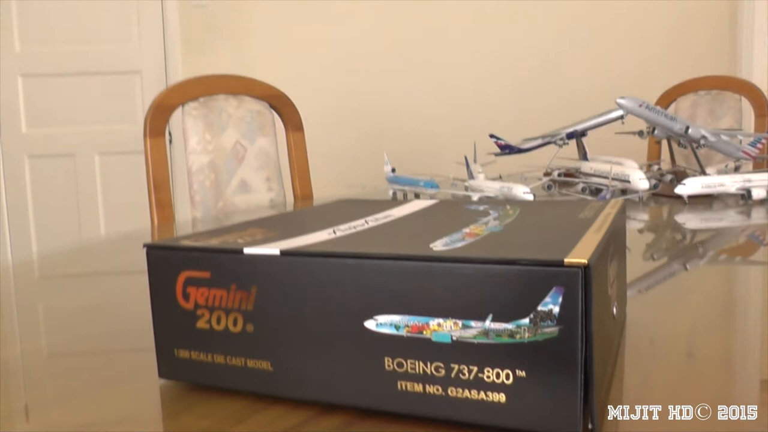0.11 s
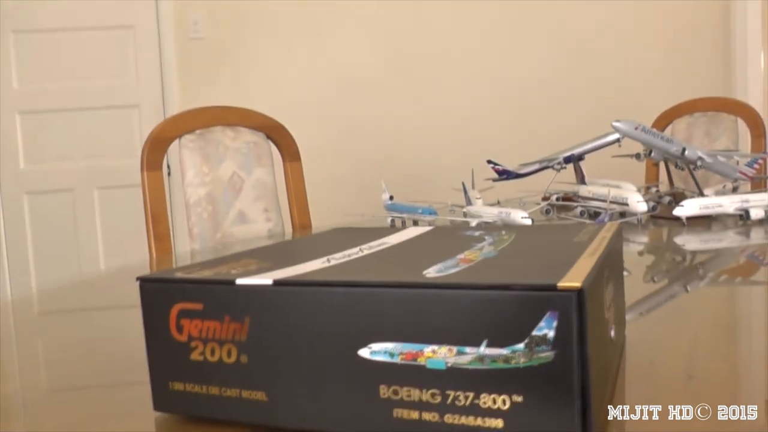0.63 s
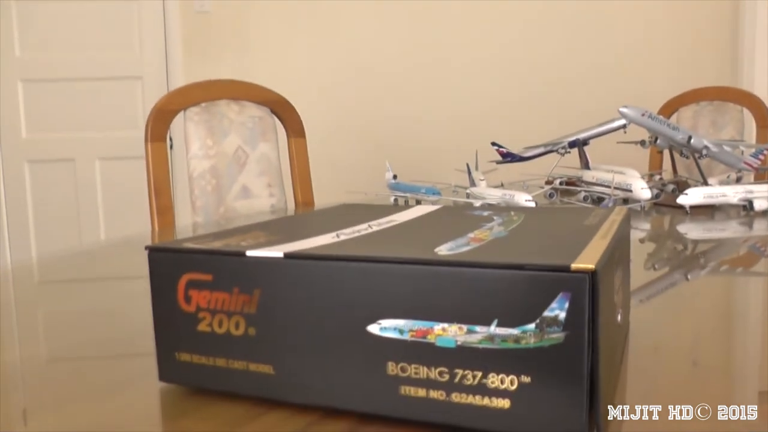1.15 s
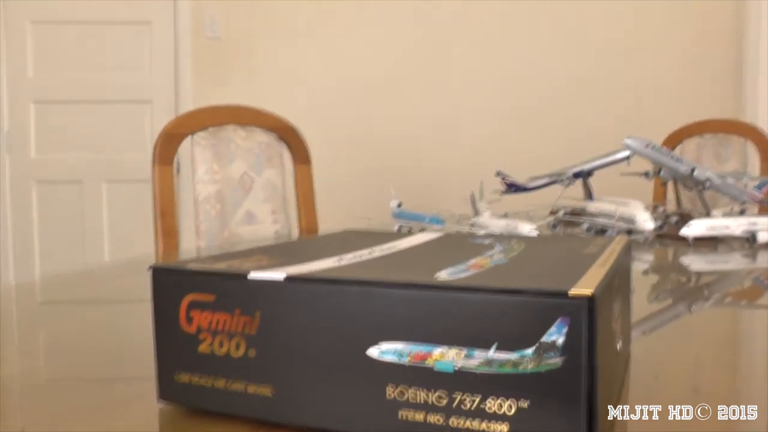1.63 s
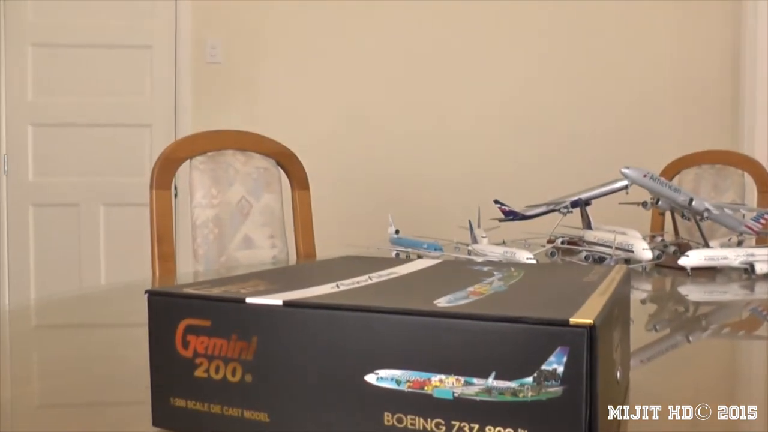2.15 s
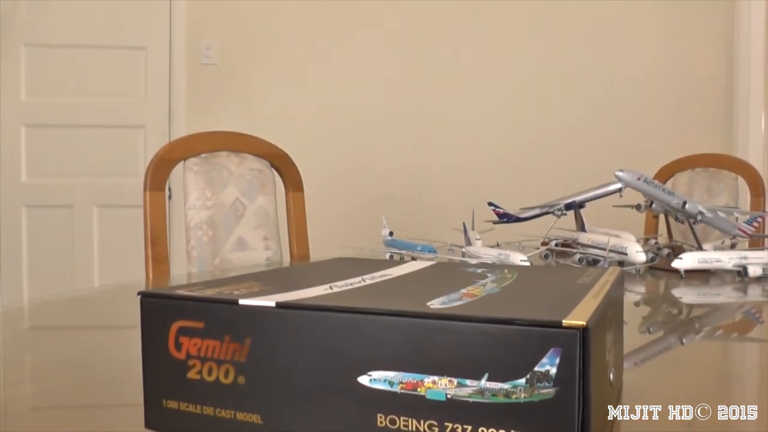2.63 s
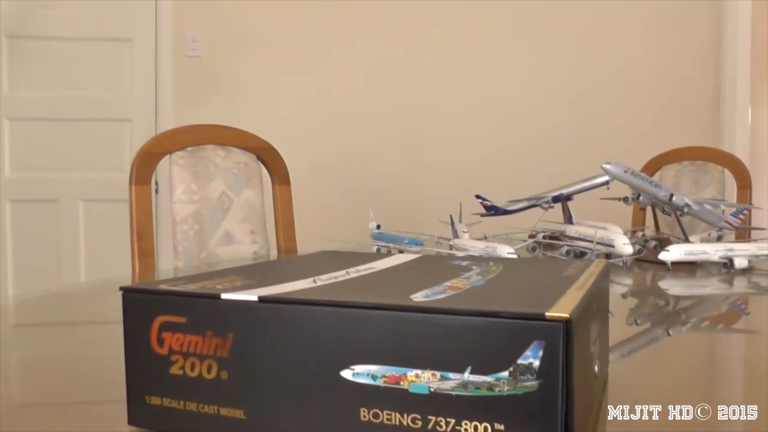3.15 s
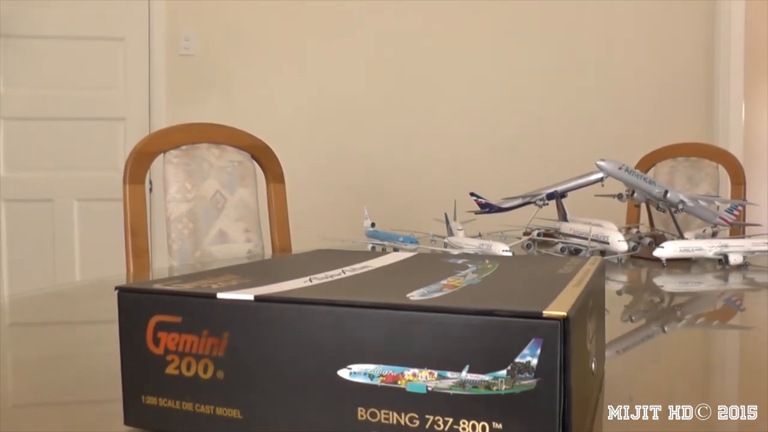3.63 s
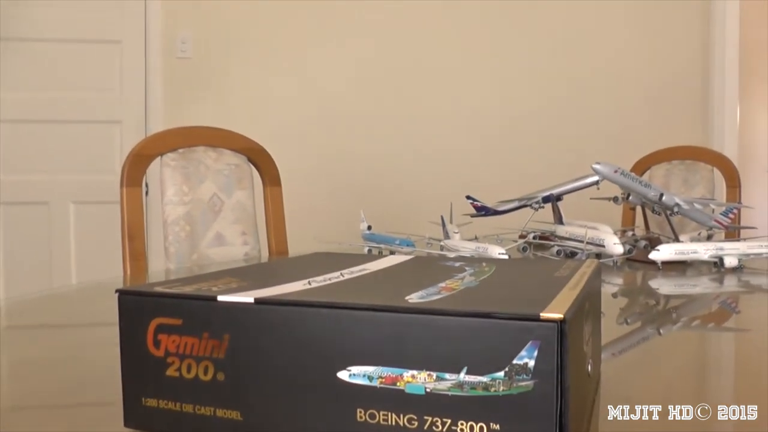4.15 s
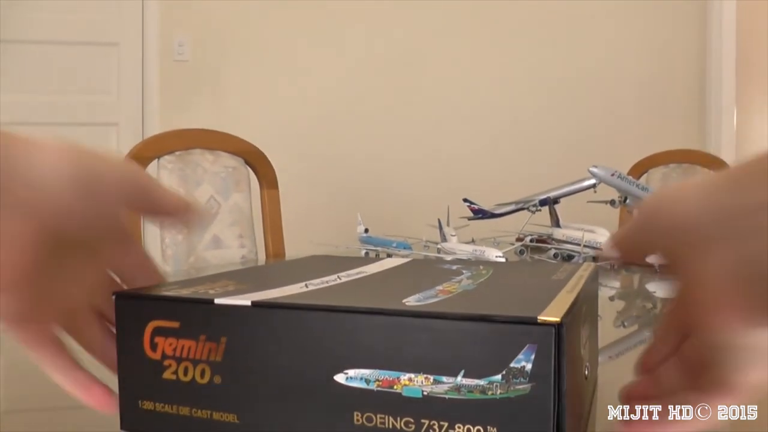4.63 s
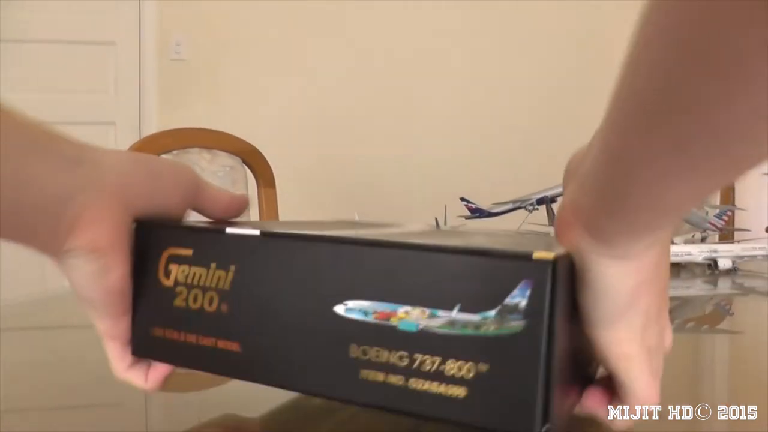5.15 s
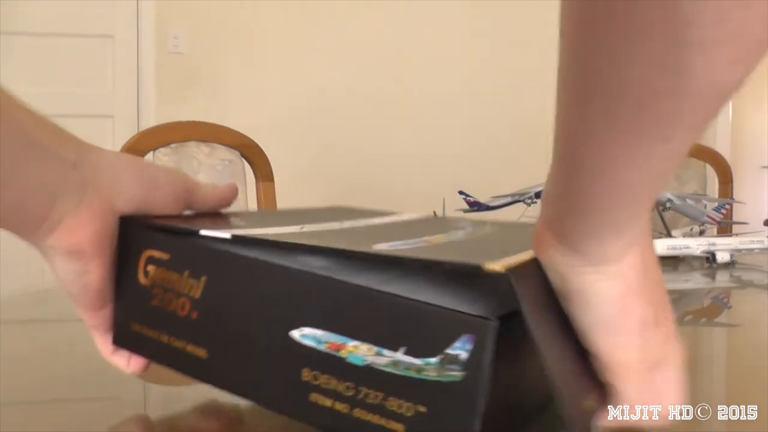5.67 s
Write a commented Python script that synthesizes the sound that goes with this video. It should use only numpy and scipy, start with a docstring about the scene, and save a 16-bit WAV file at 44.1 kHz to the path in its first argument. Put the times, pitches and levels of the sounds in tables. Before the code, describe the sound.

Plastic camera casing creaks, snaps and thuds close up, then hands slide over a cardboard box and its flap pops free with hollow knocks.

```python
"""Indoors, over steady room tone and hiss, hands first shift a small camera: its plastic shell creaks,
snaps and thuds close to the microphones, as bursts of tiny slips that excite its resonances.
Then skin slides over a cardboard box, as modulated noise with rumble, scrape and hiss, and lifts it.
Knocks excite the air and walls of the box; at the end its flap pops free with three hollow knocks
that the room answers with a diffuse decay, while the flap scrapes along the rim."""
import sys
import numpy as np
from scipy import signal
from scipy.fft import rfft, irfft, next_fast_len
from scipy.io import wavfile
from scipy.ndimage import uniform_filter1d, map_coordinates

SR = 44100
rng = np.random.default_rng(int(sys.argv[2]) if len(sys.argv) > 2 else 0)


def nominal_scale(level):
    """Amplitude ratio for a level in decibels (scalar or array-like)."""
    x = np.asarray(level, float) / 20
    return 10 ** x


def output_pcm(signal):
    """Save a mono or channel-first signal as 16-bit PCM at the path in sys.argv[1].

    Samples are clipped to [-1, 1] before scaling.
    """
    pcm = np.clip(np.atleast_2d(signal).T, -1, 1) * 32767
    wavfile.write(sys.argv[1], SR, np.round(pcm).astype(np.int16))


N = 254803


def unit(x):
    """Normalization: a signal scaled to rms 1."""
    return x / np.sqrt(np.mean(x ** 2) + 1e-20)


def along(points, hz):
    """Logarithmic frequency scale: values interpolated between (frequency [Hz], value) points."""
    f, v = np.transpose(points)
    return np.interp(np.log(hz + 1), np.log(f + 1), v)


def filtered(x, response):
    """Linear filtering: the spectrum of x times a complex frequency response."""
    size = next_fast_len(N + SR // 2)
    spectrum = rfft(x, size) * response(np.fft.rfftfreq(size, 1 / SR))
    return irfft(spectrum, size)[..., :N]


# likeness of left and right: (frequency [Hz], correlation [0-1])
LIKENESS = [(60, 0.97), (240, 0.89), (950, 0.94), (3770, 0.93), (15000, 0.011)]


def paired(two, response):
    """Interchannel coherence: two unrelated signals mix into ports alike in the bass, apart in the treble."""
    def turn(hz):
        return np.arccos(np.clip(along(LIKENESS, hz), -1, 1)) / 2

    mid, side = filtered(two, lambda hz: response(hz) * [np.cos(turn(hz)), np.sin(turn(hz))])
    return np.array([mid + side, mid - side])


def body(modes, f):
    """Modal superposition: damped resonances of alternating sign sum to a causal response of mean power 1."""
    g = 0
    for k, (center, width, db) in enumerate(modes):
        resonance = 1j * f * width / (center ** 2 - f ** 2 + 1j * f * width)
        g = g + (-1) ** k * nominal_scale(db) * resonance
    g = g / (1 + 0.5j * f / modes[-1][0]) ** 2  # steep fall in the treble
    return g / np.sqrt(np.mean(abs(g) ** 2))


def ringing(x, modes):
    """Forced vibration: x drives the resonances of a body."""
    return filtered(x, lambda hz: body(modes, hz))


def slips(times, levels_db, lengths_ms, modes, apart, swell=1, blow=0):
    """Stick-slip excitation: swelling, dying bursts of tiny slips, each with a blow at its height, ring a body.

    apart is the share that differs in sign between the ports; blow is relative to the rest of the burst."""
    out, size = np.zeros((2, N + SR)), SR // 5
    response = body(modes, np.fft.rfftfreq(size, 1 / SR))
    for s, db, ms in zip(times, levels_db, lengths_ms):
        u = 1000 * np.arange(size) / SR / max(ms, 0.1)
        shape = u ** swell * np.exp(-2 * u)
        push = rng.standard_normal((2, size)) * shape
        push[0, shape.argmax()] += blow * np.linalg.norm(shape)
        both, odd = irfft(rfft(push) * response, size)
        ring = both + apart * np.outer([1, -1], odd)
        out[:, round(s * SR):][:, :size] += nominal_scale(db) * ring / np.linalg.norm(both)
    return out[:, :N]


def crackle(per_second, spread_db):
    """Random impulse process: sparse sticks and slips of uneven size, partly shared by the ports, rms 1."""
    when, size = rng.random((2, N))
    jolts = (when < per_second / SR) * nominal_scale(-spread_db * np.log(size + 1e-4))
    separate = jolts * rng.standard_normal((2, N)) * 1.04
    shared = jolts * rng.standard_normal(N)
    return unit(separate + shared)


def rush(spectrum, grain_db, grain_rate):
    """Amplitude-modulated noise: quick random swells roughen a shaped stereo noise of rms 1."""
    knots = rng.standard_normal(N // 100)
    lumps = nominal_scale(grain_db * map_coordinates(knots, [np.arange(N) * grain_rate / SR]))
    noise = lumps * rng.standard_normal((2, N))
    return unit(paired(noise, lambda hz: nominal_scale(along(spectrum, hz))))


# room tone and microphone hiss: (frequency [Hz], relative spectral density [dB])
AIR_SPECTRUM = [(15, -27), (49, 5), (135, -39), (177, 3.5), (389, -10), (1220, -59), (1640, -8.5),
                (2460, -28.5), (15500, -30), (16100, -64)]


def room_tone():
    """Stationary background noise: room tone and microphone hiss at a nearly steady level."""
    return nominal_scale(-64) * rush(AIR_SPECTRUM, grain_db=0.6, grain_rate=12)


# decay of the room: (frequency [Hz], time to fall by 60 dB [s])
ROOM_DECAY = [(200, 0.65), (3000, 0.5), (10000, 0.11)]


def room(x):
    """Diffuse reverberation: each frequency of the room's answer decays exponentially at its own speed."""
    hz, t, z = signal.stft(rng.standard_normal((2, SR // 2)), SR, nperseg=256)
    decay = nominal_scale(-60 * t / along(ROOM_DECAY, hz)[:, None])
    tail = signal.istft(z * decay, SR, nperseg=256)[1]
    tail = tail / np.linalg.norm(tail[0])
    delayed = np.pad(x.mean(0), (250, 0))  # samples before the first reflection
    wet = signal.fftconvolve(delayed[None], tail, axes=1)[:, :N]
    return paired(wet, np.ones_like)


# skin squeaks on plastic, and in the last row one short high tick on the card:
# (start [s], length [s], starting pitch [Hz], level before grit [dB])
SQUEAKS = [(0.687, 0.063, 1740, -59), (.806, .025, 1790, -52), (3.181, 0.049, 774, -43.5),
           (5.422, 0.0043, 3070, -45.5)]
SQUEAK_RISE = 0.062  # share by which the pitch climbs within each tone


def squeaks():
    """Frictional self-oscillation: skin squeaks on plastic, rising, unsteady and gritty; a like tone, only
    milliseconds long, is a high tick on the card."""
    out = np.zeros(N)
    for s, length, hz, db in SQUEAKS:
        t = np.arange(round(length * SR)) / SR
        wander = np.cumsum(0.051 * rng.standard_normal(SR // 5))[:len(t)]
        phase = 2 * np.pi * hz * t * (1 + SQUEAK_RISE * t / length / 2) + wander
        grit = uniform_filter1d(rng.standard_normal(SR // 5), SR // 400)[:len(t)]
        level = nominal_scale(db + 3 * unit(grit)) * np.sin(np.pi * t / length) ** 0.2
        out[round(s * SR):][:len(t)] += level * np.sin(phase)
    return out


# the resting hands never lie quite still: (time [s], level [dB])
REST = [(.3, -58), (.8, -49), (1.03, -63.5), (1.57, -56), (2.1, -55.5), (2.5, -65), (3.1, -56.5),
        (3.45, -62.5), (3.8, -57), (4.25, -64), (4.85, -58.5), (5.57, -61.5)]
# strokes of skin on shell and card: (start [s], length [s], level at the end [dB], swell to it [dB],
# lightness: more hiss, less rumble [dB])
STROKES = [(-.015, 0.12, -62.5, -16.5, 14.5), (0.854, 0.06, -45, -10.5, 2), (1.091, 0.22, -42, 10.5, -1),
           (1.616, 0.12, -41, 12, 0.5), (1.76, 0.1, -58.5, 2, -8.5), (2.095, 0.036, -48.5, -37.5, 0),
           (3.043, 0.057, -51, -17, 1.5), (3.616, 0.16, -49.5, 7.5, 4), (4.467, 0.26, -49, 5, -2),
           (5.07, 0.086, -56.5, 1, -8.5), (5.591, 0.18, -54.5, -13.5, 1)]
STROKE_ATTACK_S, STROKE_FADE_DB_PER_S = 0.012, 228
HISS_LINGERS = 0.32  # share by which the hiss fades slower and the rumble faster
REST_LIGHTNESS_DB = 0.5


def rubbing(tilt):
    """Energy addition: resting hands and strokes that set in, swell or sag and fade; tilt weighs lightness."""
    t = np.arange(N) / SR
    power = nominal_scale(np.interp(t, *np.transpose(REST)) + tilt * REST_LIGHTNESS_DB) ** 2
    fade_rate = STROKE_FADE_DB_PER_S * (1 - HISS_LINGERS * tilt)
    for s, length, db, swell_db, light_db in STROKES:
        k = slice(max(round(s * SR), 0), round((s + length + 0.4) * SR))
        u = t[k] - s
        swell = swell_db * np.maximum(1 - u / length, 0)
        fade = fade_rate * np.maximum(u - length, 0)
        level_db = db - swell - fade + tilt * light_db
        power[k] += (np.minimum(u / STROKE_ATTACK_S, 1) * nominal_scale(level_db)) ** 2
    return np.sqrt(power)


# spectra of sliding skin: (frequency [Hz], relative spectral density [dB])
RUMBLE_SPECTRUM = [(20, -31), (60, -0.5), (250, -4.5), (700, -44)]
SCRAPE_SPECTRUM = [(150, -19), (300, 6), (500, 1), (900, 3.5), (1900, -8), (5000, -33.5)]
HISS_SPECTRUM = [(1500, -10.5), (2400, -10.5), (3500, -13), (4450, -16.5), (5730, -9), (7770, -12.5),
                 (8970, -16.5), (11900, -18.5), (15700, -33), (16500, -57)]
# fingertips brush the card: (time [s], level [dB])
BRUSHES = [(4.894, -28), (5.02, -29.5), (5.11, -24.5), (5.239, -28.5), (5.376, -27.5)]
BRUSH_MS = 50
ON_SHELL_S = 3.9  # the hands leave the shell
SHELL_RUMBLE_DB, SHELL_HISS_DB = -4, -11  # layer gains on the shell
CARD_RUMBLE_DB, CARD_HISS_DB = -9, -6  # layer gains on the card


def hands():
    """Sliding friction: skin rumbles, scrapes, hisses and catches in bumps; the touched body colours it."""
    on_shell = np.arange(N) < ON_SHELL_S * SR
    card = BOX_AIR + BOX_WALLS
    catches = crackle(per_second=170, spread_db=1.5)
    bumps = np.where(on_shell, unit(ringing(catches, SHELL_WALLS)), unit(ringing(catches, card)))
    ticks = on_shell * ringing(crackle(per_second=110, spread_db=3), SHELL_FIZZ)
    s, db = np.transpose(BRUSHES)
    brushes = slips(s, db, [BRUSH_MS] * len(s), CARD_EDGE[2:], apart=0.48)

    rumble = rush(RUMBLE_SPECTRUM, grain_db=2.0, grain_rate=28)
    shell_rumble = nominal_scale(SHELL_RUMBLE_DB) * unit(ringing(rumble, SHELL_THUD[:2]))
    rumble = np.where(on_shell, shell_rumble, nominal_scale(CARD_RUMBLE_DB) * rumble)

    scrape = rush(SCRAPE_SPECTRUM, grain_db=2.5, grain_rate=56)
    card_scrape = unit(scrape + unit(ringing(scrape, card)))
    scrape = np.where(on_shell, nominal_scale(-6) * scrape, card_scrape) + nominal_scale(-8) * bumps

    hiss = rush(HISS_SPECTRUM, grain_db=2.5, grain_rate=38) + nominal_scale(-9) * ticks
    hiss = nominal_scale(np.where(on_shell, SHELL_HISS_DB, CARD_HISS_DB)) * hiss
    return rubbing(tilt=-1) * rumble + rubbing(tilt=0) * scrape + rubbing(tilt=1) * hiss + brushes


# Levels and lengths of creaks, ticks and taps are scaled by each layer's factors in creaks().
# creaks of the camera shell: (time [s], click level [dB], knock level [dB], fizz over click [dB],
# slip length [ms])
CREAKS = [(0.5964, -38, -33, -16, 5.7), (0.6851, -33, -43.5, 2.5, 3.76), (0.813, -41.5, -33, -34, 11.1),
          (.855, -24.5, -31.5, 0, 6.33), (1.225, -20.5, -23.5, -6, 2.77), (1.2698, -46, -41, 11.5, 1.3),
          (1.314, -31.5, -36.5, -7, 8.4), (1.335, -39.5, -57, 0, 2.5), (1.4304, -37.5, -35.5, -16.5, 1.23),
          (1.4876, -49, -31, -9, 3.1), (1.7399, -39, -29.5, -20, 2.4), (1.748, -31, -27.5, 5.5, 10.2),
          (1.783, -32.5, -36, -9.5, 7.9), (1.852, -45.5, -39.5, -0.5, 2.7),
          (2.0431, -24.5, -27.5, -13, 4.5), (2.0885, -19, -12, -10, 9.1), (2.278, -44.5, -38.5, -10.5, 6.3),
          (2.3517, -35, -36.5, -46, 1.1), (2.4968, -23, -33.5, -12.5, 2), (2.6883, -17, -30.5, -9, 2.36),
          (2.88, -20.5, -28.5, -7.5, 2.08), (2.9342, -25.5, -31, -6, 2), (3.0179, -26, -28.5, -5, 1.46),
          (3.0564, -36, -28, -2, 13.8), (3.232, -16, -22, -13, 2.03), (3.546, -47.5, -41, -16, 6.7),
          (3.6107, -39.5, -43.5, -2.5, 6.6), (3.6764, -44, -45.5, 2, 4.14), (3.732, -43.5, -35, -16, 9.1)]
# faint ticks of the joints, too light to knock the walls: (time [s], click level [dB])
TICKS = [(0.652, -39.5), (1.123, -53.5), (1.175, -46.5), (1.293, -44), (1.453, -48), (1.553, -45.5),
         (1.82, -53.5), (1.873, -44.5), (1.9838, -43.5), (3.113, -40), (3.161, -48)]
TICK_FIZZ_DB, TICK_MS = -2.5, 3.1
# dull fingertip taps on the shell: (time [s], knock level [dB])
TAPS = [(0.337, -47.5), (0.388, -50.5), (.468, -45), (0.542, -49.5), (.572, -46), (0.7265, -41),
        (.79, -42.5), (.888, -38), (1.148, -48), (1.21, -39), (1.349, -40.5), (1.6213, -35.5), (2.11, -27),
        (2.908, -43), (3.768, -42)]
TAP_MS = 3.7
# resonances of the shell by group: (frequency [Hz], width [Hz], relative level [dB])
SHELL_SNAP = [(1824, 390, 6), (2490, 270, 0), (2920, 325, 4.5)]
SHELL_WALLS = [(597, 262, 2.15), (881, 113, 8.8), (1198, 161, 2.4)]
SHELL_THUD = [(108, 30.5, -5.5), (150.6, 23, -4.5), (220, 57, 5)]
SHELL_FIZZ = [(5220, 150, 1), (6230, 720, 1.5), (7850, 6100, -5), (12860, 7300, -14)]
GRIP_EASES_S = 2.2  # until then the palm presses on the shell and the thuds are stronger
THUD_GRIPPED_DB, THUD_EASED_DB = -5.5, -15  # thud relative to knock, before the layer gains
KNOCK_SHARE = 0.55  # part of a slip that knocks the walls
SHELL_BLOW = 1.18  # the sharp blow over the rest of its burst
LEAD_MS = 0.012  # near sounds reach the left port first


def creaks():
    """Stick-slip in the joints: creaks click, fizz and knock, ticks lack the knock, taps only knock and thud."""
    s, click_db, knock_db, fizz_db, ms = np.transpose(CREAKS)
    tick_s, tick_db = np.transpose(TICKS)
    click_s, click_db = np.r_[s, tick_s], np.r_[click_db, tick_db]
    fizz_db = click_db + np.r_[fizz_db, TICK_FIZZ_DB + 0 * tick_s]
    slip_ms = np.r_[ms, TICK_MS + 0 * tick_s]
    snap = slips(click_s, click_db, slip_ms * 0.671, SHELL_SNAP, apart=0.2, swell=0.8085, blow=SHELL_BLOW)
    fizz = slips(click_s, fizz_db, slip_ms * 0.99, SHELL_FIZZ, apart=1.0, swell=0.1, blow=SHELL_BLOW)

    tap_s, tap_db = np.transpose(TAPS)
    s, knock_db, ms = np.r_[s, tap_s], np.r_[knock_db, tap_db], np.r_[ms, TAP_MS + 0 * tap_s]
    thud_db = knock_db + np.where(s < GRIP_EASES_S, THUD_GRIPPED_DB, THUD_EASED_DB)
    # the walls swing a moment later
    walls = slips(s + 0.00069, knock_db, ms * KNOCK_SHARE, SHELL_WALLS, apart=0.74, blow=SHELL_BLOW)
    thud = slips(s + 0.0018, thud_db, ms * 0.43, SHELL_THUD[1:], apart=0.27, blow=SHELL_BLOW)

    near = nominal_scale(15.5) * snap + nominal_scale(20.0) * fizz + nominal_scale(21.5) * walls + nominal_scale(25) * thud
    return filtered(near, lambda hz: np.exp(1j * np.pi * np.outer([1, -1], hz) * LEAD_MS / 1000))


# knocks on the box, scaled by each layer's factors in box(): (time [s], boom level [dB],
# panel level [dB], tick level [dB], contact length [ms])
KNOCKS = [(4.474, -52, -42.5, -52, 1.3), (4.749, -53, -45, -41, 1.5), (5.057, -49, -48, -64, 1.6),
          (5.101, -42.5, -70, -70, 6), (5.083, -40.5, -76, -67, 0.8), (5.291, -40.5, -34.5, -43.5, 6.05),
          (5.365, -74, -70, -44.5, 2.2), (5.399, -46.5, -55, -67, 4.4), (5.445, -45, -61, -65, 0.65),
          (5.5835, -18, -6, -16, 6.97), (5.648, -10.5, -21, -29, 4.2), (5.681, -21.5, -14, -31.5, 1.36)]
# resonances of the air in the box, its card walls and the card edge:
# (frequency [Hz], width [Hz], relative level [dB])
BOX_AIR = [(208, 73, -1), (285, 42, 0), (484, 110, 1.5)]
BOX_WALLS = [(633, 87, 4.5), (780, 71, 2.5), (1120, 73, -12)]
CARD_EDGE = [(1730, 660, 12), (3560, 220, -2), (5600, 1700, 3.5), (9050, 6100, 1)]
# the freed flap scrapes along the rim: (time [s], length [ms], level [dB])
FLAP = (5.59, 160, -14)
# resonance of the rim: (frequency [Hz], width [Hz], relative level [dB])
RIM = [(2200, 480, 0)]
BOX_BLOW = 1.37  # the sharp blow over the rest of its burst


def box():
    """Cavity and plate resonance: knocks boom in the air, shake the walls and tick the edge; the flap scrapes."""
    s, boom_db, panel_db, tick_db, ms = np.transpose(KNOCKS)
    boom = slips(s + 0.0012, boom_db, ms * 0.5, BOX_AIR, apart=0.18, blow=BOX_BLOW)
    panel = slips(s + 0.001114, panel_db, ms * 0.467, BOX_WALLS, apart=0.19, blow=BOX_BLOW)
    tick = slips(s + 0.0017, tick_db, ms * 0.46, CARD_EDGE, apart=0.26)
    flap_s, flap_ms, flap_db = FLAP
    flap = slips([flap_s], [flap_db], [flap_ms], RIM, apart=0.64, swell=0.11)
    return nominal_scale(25) * boom + nominal_scale(17.5) * panel + nominal_scale(16.0) * tick + flap


def scene():
    """Direct and reverberant sound: the close shell is nearly dry, while the box excites the room."""
    near, knocks = creaks(), box()
    echo = room(nominal_scale(-30.0) * near + nominal_scale(-11.5) * knocks)
    return room_tone() + echo + squeaks() + hands() + near + knocks


def roll_off(x):
    """The treble ends steeply here."""
    return signal.sosfilt(signal.butter(12, 16820, fs=SR, output="sos"), x)


# the microphone port cancels a narrow band: (frequency [Hz], half width [Hz], depth [0-1])
PORT_NOTCH = (7724, 510, 0.81)


def record(dry):
    """Destructive interference: the microphone port cuts a narrow notch into the mix."""
    dip_hz, width_hz, depth = PORT_NOTCH
    heard = filtered(dry, lambda hz: 1 - min(depth, 1) / (1 + ((hz - dip_hz) / width_hz) ** 2))
    return roll_off(heard)


dry = scene()
out = record(dry)
output_pcm(out)
```